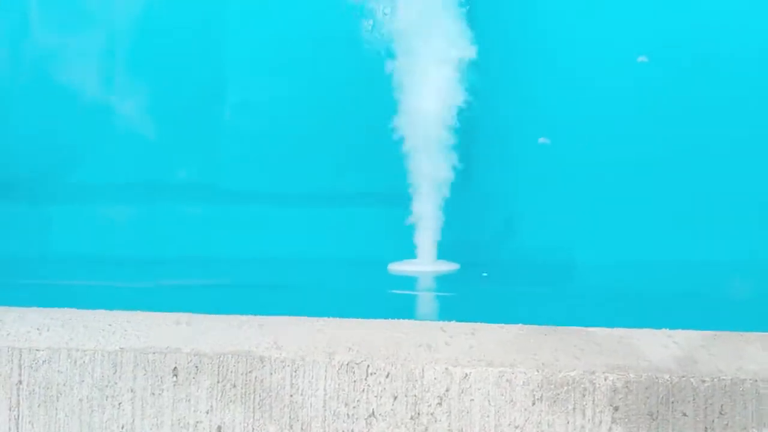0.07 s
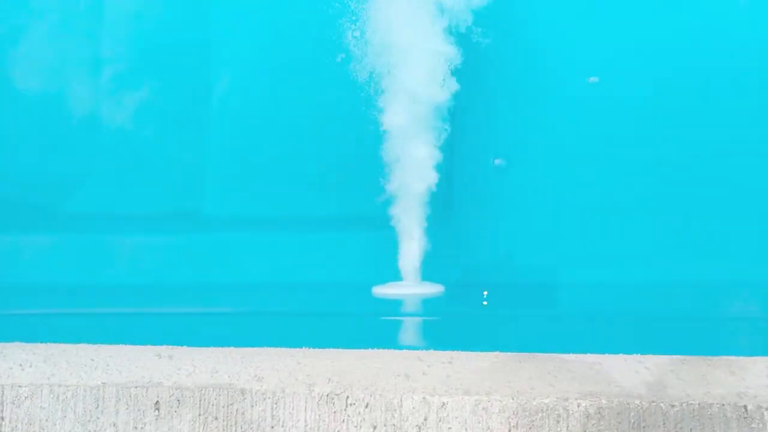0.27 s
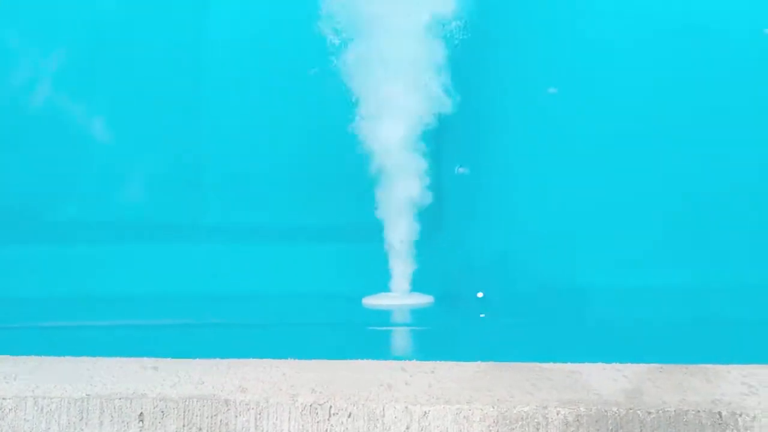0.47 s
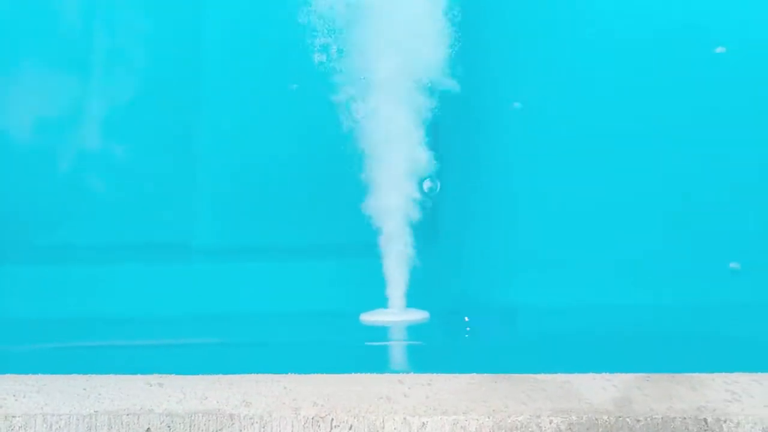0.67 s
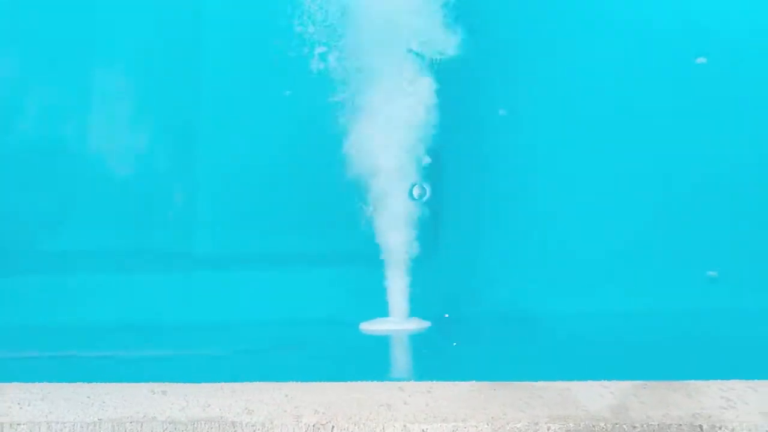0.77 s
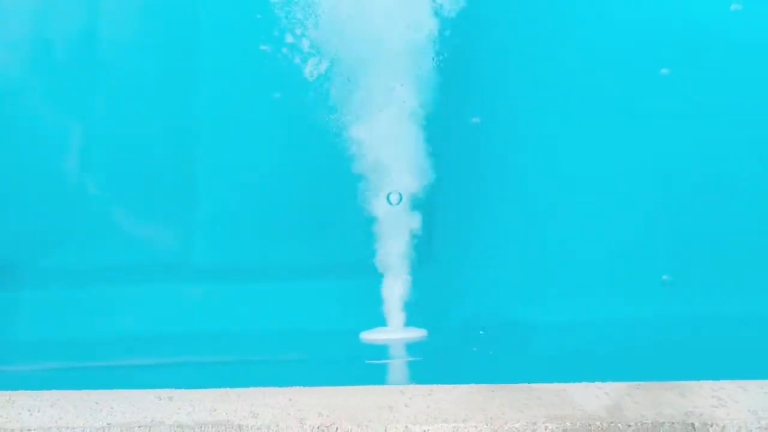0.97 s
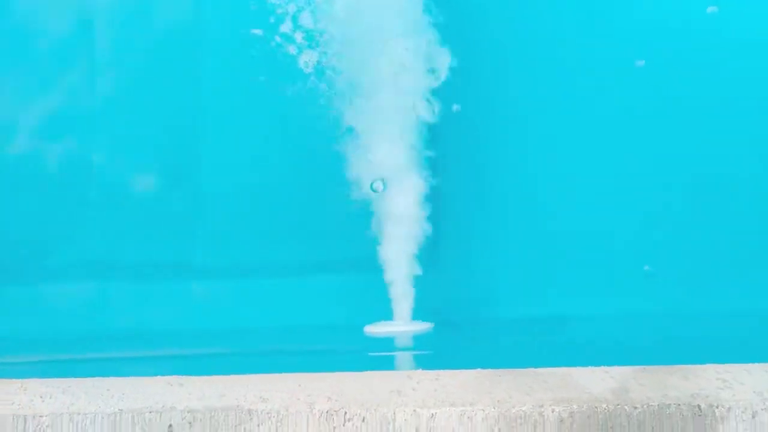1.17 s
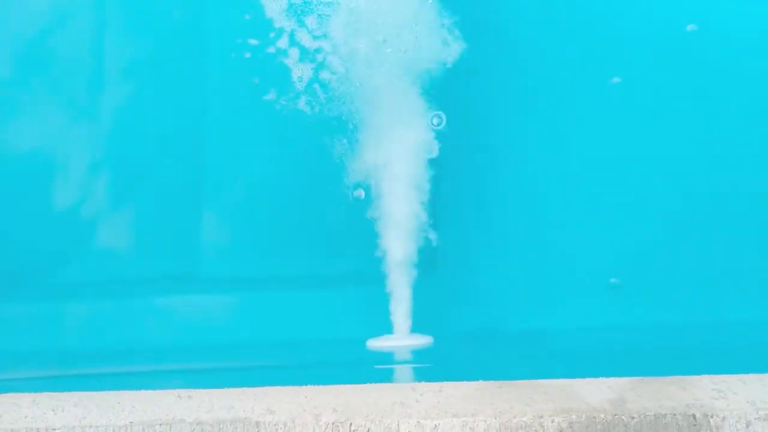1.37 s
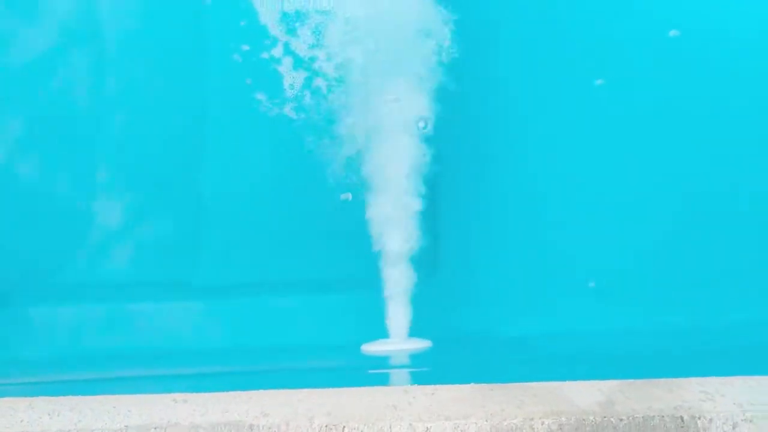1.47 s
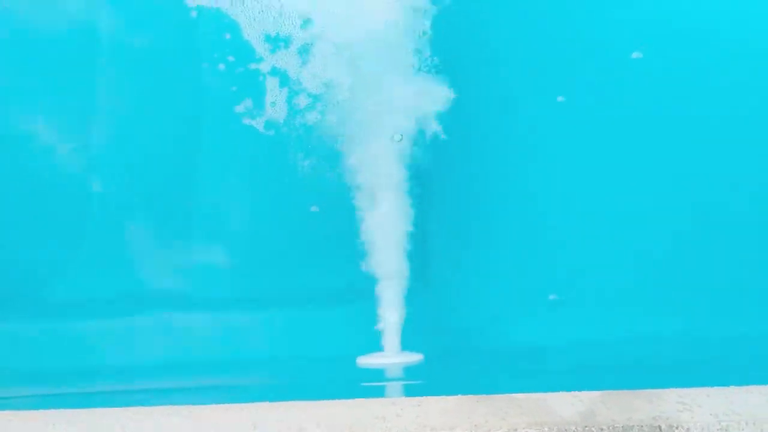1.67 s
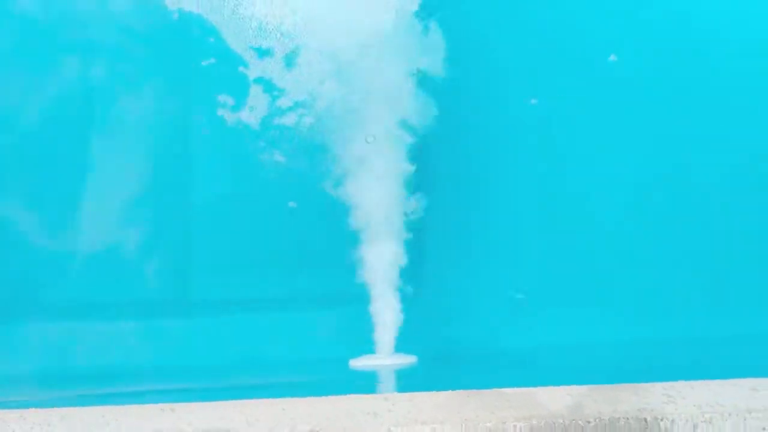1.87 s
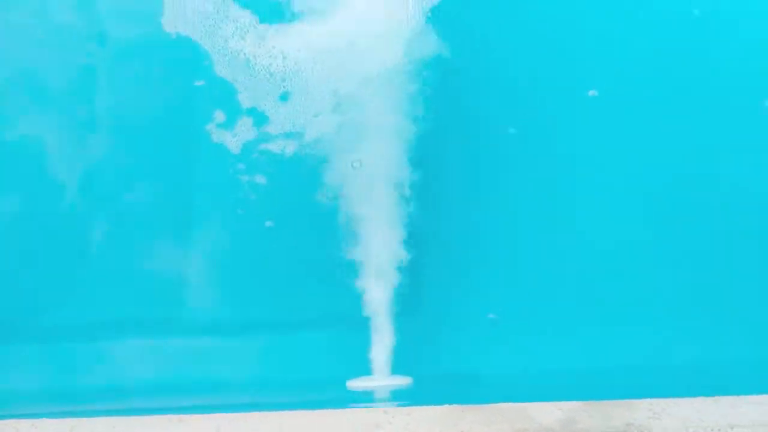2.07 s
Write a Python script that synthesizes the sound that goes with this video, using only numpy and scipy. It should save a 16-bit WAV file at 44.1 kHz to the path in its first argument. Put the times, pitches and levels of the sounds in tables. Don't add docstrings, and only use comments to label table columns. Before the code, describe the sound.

A pool jet blows water and air bubbles, a steady hollow churning rumble with bright fizzing splashes strongest at first, then thinning to a few faint ringing bubbles; outdoors, close small stereo recorder.

```python
import sys
import numpy as np
from scipy import signal
from scipy.fft import rfft, irfft, next_fast_len
from scipy.io import wavfile
from scipy.ndimage import uniform_filter1d, map_coordinates

SR = 44100
rng = np.random.default_rng(int(sys.argv[2]) if len(sys.argv) > 2 else 0)


def amp(db):
    return 10 ** (np.asarray(db, float) / 20)


def write(x):
    x = np.atleast_2d(x).T
    wavfile.write(sys.argv[1], SR, np.round(np.clip(x, -1, 1) * 32767).astype(np.int16))


N = 93536


def unit(x):
    return x / np.sqrt(np.mean(x ** 2) + 1e-20)


def along(points, hz):
    f, v = np.transpose(points)
    return np.interp(np.log(hz + 1), np.log(f + 1), v)


def curve(rows):
    s, v = np.transpose(rows)
    return np.interp(np.arange(N) / SR, s, v)


def wobble(rate):
    return map_coordinates(rng.standard_normal(400), [np.arange(N) * rate / SR])


def filtered(x, response):
    m = next_fast_len(N + SR // 2)
    return irfft(rfft(x, m) * response(np.fft.rfftfreq(m, 1 / SR)), m)[..., :N]


def patchy(x, patchy_db):
    z = signal.stft(x, nperseg=512)[2]
    field = rng.standard_normal(z.shape[1:])
    field = uniform_filter1d(uniform_filter1d(field, size=8, axis=0), size=8, axis=1)
    uneven = signal.istft(z * amp(patchy_db * unit(field)), nperseg=512)[1]
    return unit(uneven[:, :N])


def partly_alike(pair, alike):
    return np.array([pair[0], alike * pair[0] + np.sqrt(1 - alike ** 2) * pair[1]])


def bursts(count, spread_db, share):
    pops = []
    for at, size, sign in rng.random((3, 2, count)).swapaxes(0, 1):
        strength = amp(spread_db * size) * np.sign(sign - 0.5)
        pops.append(np.bincount((at * N).astype(int), strength, N))
    return np.sqrt(share) * unit(np.array(pops)) + np.sqrt(1 - share) * rng.standard_normal((2, N))


def ports(pair, left, right):
    # middle in Hz, width in Hz, depth from 0 to 1.
    common_dips = [(1864, 390, 0), (3078, 62, 0.3), (3690, 120, .7), (4370, 200, 0.4), (4985, 160, 0.5),
                   (6420, 280, 0)]

    def response(hz):
        dips = 1
        for middle, w, depth in common_dips:
            dips = dips * (1 - np.clip(depth, 0, 0.95) * np.exp(-((hz - middle) / w) ** 2))
        no_lows = hz ** 2 / (hz ** 2 + 1200 ** 2)
        return amp([along(left, hz), along(right, hz)]) * dips * no_lows

    out = filtered(pair, response)
    return out / np.std(out[0])


def pipe(f):
    # pitch in Hz, width in Hz, level in dB.
    pipe_modes = [(85.6, 32, -3), (244.1, 25, -13.5), (438.8, 16.7, -3), (501.7, 40, -5), (577.5, 33.5, -1),
                  (721, 70, -3.5), (901, 99, -7.5), (1098, 25, -2.5), (1297, 35, -3.5), (1489, 41.6, -6),
                  (1676, 16, -10.5)]
    top_hz, low_hz = 1657.4, 33
    modes = sum(amp(2 * db) * (f * w) ** 2 / ((c * c - f * f) ** 2 + (f * w) ** 2)
                for c, w, db in pipe_modes)
    return np.sqrt(modes / (1 + (f / top_hz) ** 90)) * f / np.hypot(f, low_hz)


def swelling(x):
    # time in seconds, strength of the gulps in dB.
    gulps = [(0.0, -52), (0.13, -51.5), (0.17, -58), (0.58, -54.5), (0.61, -51), (0.66, -54), (0.86, -55.5),
             (0.88, -67.5), (0.93, -49.5), (1.16, -56.5), (1.32, -63), (1.39, -51.5), (1.45, -63),
             (1.48, -59), (1.91, -53.5), (2.12, -63.5)]
    # time in seconds, strength of the singing in dB.
    singing = [(0.0, -43), (0.1, -41.5), (0.5, -40.5), (0.51, -45), (0.7, -35), (0.74, -42.5),
               (0.99, -38.5), (1.01, -40.5), (1.08, -44.5), (1.1, -32.5), (1.18, -40), (1.31, -37),
               (1.88, -39), (1.9, -38), (2.08, -35), (2.12, -42)]
    gulp_hz, sing_hz = 145, 1246

    def low_and_high(f):
        return np.array([1 / (1 + (f / gulp_hz) ** 8), 1 - 1 / (1 + (f / sing_hz) ** 30)])

    low, high = filtered(x, low_and_high)
    gulp, sing = curve(gulps), curve(singing)
    gulp_gain = amp(gulp - gulp.mean() - 1.5)
    sing_gain = amp(sing - sing.mean() - 0.5)
    return x + low * (gulp_gain - 1) + high * (sing_gain - 1)


def jet():
    # time in seconds, strength of the jet in dB.
    flow = [(0.0, -35.5), (0.5, -36), (0.93, -35.5), (1.11, -33.5), (1.6, -36), (2.12, -36.5)]
    # pitch in Hz, right port over left in dB.
    right_over_left = [(60, -2), (210, -5.5), (600, -5), (880, -3), (1000, -3.1), (1150, 1.5), (1700, -1.5)]
    # pitch in Hz, how far the right port leads in radians.
    right_leads = [(30, 3.46), (700, 2.87), (900, 2.54), (1000, 2.77), (1110, 2.47), (1250, 1.8),
                   (1500, 1.35), (1800, 2.87)]
    # pitch in Hz, share unrelated between the ports in dB.
    unrelated = [(30, -13), (70, -13), (330, -10), (500, -14.5), (1000, -14), (1200, -14), (1700, -11)]
    churn, stray = filtered(patchy(rng.standard_normal((2, N)), patchy_db=1.37), pipe)
    churn, stray = swelling(churn), swelling(stray)

    def turn(hz):
        return amp(along(right_over_left, hz)) * np.exp(1j * along(right_leads, hz))

    stray = filtered(stray, lambda hz: amp(along(unrelated, hz)))
    right = filtered(churn + stray, turn)
    level_db = curve(flow) + 7.5 + 0.55 * wobble(9.1)
    return amp(level_db) * np.array([churn, right]) / np.std(churn)


def drifting(start):
    # pitch in Hz, gain from start to end in dB.
    tilt = [(80, -4), (150, 2), (240, 11.5), (320, 1.5), (550, 3.5), (1100, -2.5), (1500, -1), (1690, 6)]
    share = np.linspace(0, 1, N)
    end = filtered(start, lambda hz: amp(along(tilt, hz)))
    return (1 - share) * start + share * end


def splash():
    # time in seconds, strength of large bubbles breaking in dB.
    breaking = [(0.0, -38.5), (0.02, -36), (0.05, -42.5), (0.16, -43.5), (0.18, -40), (0.19, -45.5),
                (0.29, -42.5), (0.53, -41.5), (0.74, -54.5), (0.89, -55.5), (0.92, -59), (1.01, -50),
                (1.03, -55), (1.16, -51), (1.37, -62.5), (2.12, -65.5)]
    # pitch in Hz, level in dB per Hz.
    splash_left = [(1500, -19), (2100, -4), (3000, -7.5), (4300, -1.5), (4900, -7.5), (5600, -6.5),
                   (7000, -11.5), (10000, -11.5)]
    # pitch in Hz, level in dB per Hz.
    splash_right = [(1500, -23), (2300, -17), (3000, -9), (3500, -13.5), (5600, -7), (7500, -15.5),
                    (8700, -51), (15500, -53)]
    pops = patchy(bursts(count=5000, spread_db=25, share=0.4), patchy_db=2.0)
    pair = ports(partly_alike(pops, 0.13), splash_left, splash_right)
    right_fades_db = -4
    fade = amp(np.outer([0, right_fades_db], np.clip(np.arange(N) / SR, 0, 1)))
    return amp(9 + 0.99 * curve(breaking)) * pair * fade


def fizz():
    # time in seconds, strength of the fine foam in dB.
    fine_foam = [(0.0, -33.5), (0.02, -26.5), (0.03, -31), (0.13, -38), (0.16, -38), (0.18, -34.5),
                 (0.22, -40), (0.27, -35.5), (0.32, -38.5), (0.37, -36.5), (0.39, -41), (0.42, -36),
                 (0.47, -37), (0.52, -32.5), (0.56, -45), (0.58, -41.5), (0.62, -46), (0.88, -48.5),
                 (1.01, -46), (1.07, -48.5), (1.11, -42.5), (1.14, -49.5), (1.165, -41.5), (1.2, -44.5),
                 (1.23, -45), (1.74, -46), (1.84, -42), (1.95, -47), (2.12, -45)]
    # pitch in Hz, level in dB per Hz.
    fizz_left = [(2000, -21.5), (5000, -34.5), (7000, -13.5), (9000, -7), (11000, 0), (12000, -6.5),
                 (13500, -8), (15600, -15)]
    # pitch in Hz, level in dB per Hz.
    fizz_right = [(2000, -27), (6000, -27), (8000, -20), (9000, -33), (10800, -23), (12000, -25),
                  (13200, -25), (14500, -18)]
    pops = patchy(bursts(count=9000, spread_db=16, share=0.24), patchy_db=1.18)
    return amp(7 + 1.0164 * curve(fine_foam)) * ports(pops, fizz_left, fizz_right)


def foam():
    return amp(0.9 * wobble(40)) * (splash() + fizz())


def nozzle():
    # pitch in Hz, width in Hz, level in dB.
    resonances = [(2600, 150, 6), (3480, 66, 1), (4270, 430, -12), (5650, 380, 1), (6640, 230, -3)]
    # time in seconds, swell of the hiss in dB.
    hiss_swell = [(0.0, -0.5), (0.9, -3), (1.3, -1), (1.45, 7), (1.6, 0), (1.85, 1.5), (1.98, 2.5),
                  (2.12, -0.5)]

    def bands(f):
        return sum(amp(db) * np.exp(-((f - c) / w) ** 2) for c, w, db in resonances)

    hiss = unit(filtered(patchy(rng.standard_normal((2, N)), patchy_db=5.0), bands))
    level_db, right_db = -60.5, -5
    return amp(level_db + np.array([[0], [right_db]]) + curve(hiss_swell)) * partly_alike(hiss, 0.48)


def bubbles():
    # start in seconds, pitch in Hz, level in dB, left over right in dB.
    rings = [
        (1.095, 2900, -48, -1),
        (1.105, 3180, -48, 2.5),
        (1.16, 4470, -53, 15),
        (1.429, 2520, -53.5, 2),
        (1.47, 2670, -54.5, -7),
        (1.957, 2620, -51, -1.5),
        (1.99, 2440, -55.5, 7),
    ]
    t60_s, attack_s, rises = 0.12, 0.0026, 0.041
    out, t = np.zeros((2, N + SR)), np.arange(SR // 4) / SR
    for s, hz, db, pan_db in rings:
        tone = np.sin(2 * np.pi * hz * t * (1 + rises * t / t60_s / 2))
        ring = tone * amp(db - 60 * t / t60_s) * (1 - np.exp(-t / attack_s))
        out[:, round(s * SR):][:, :len(t)] += amp([[pan_db / 2], [-pan_db / 2]]) * ring
    return out[:, :N]


def starved(x):
    # pitch in Hz, rounding step over nearby level in dB.
    step_left = [(1200, -18), (1850, 0), (3000, 1), (5000, 1), (6500, -2), (8500, -13), (12500, -16),
                 (15400, 3)]
    # pitch in Hz, rounding step over nearby level in dB.
    step_right = [(1200, -18), (2000, -1), (3000, 2), (6000, 0), (7500, 0), (8800, 5), (13500, 3),
                  (14500, 30)]
    # pitch in Hz, width in Hz, extra step in dB.
    worst_bands = [(1920, 140, 6), (3060, 120, 6), (3620, 140, 8), (4680, 110, 5), (5150, 150, 6),
                   (6380, 110, 4), (6900, 150, 3)]
    hop, grid = 1024, 608
    n, k = np.arange(2 * hop)[:, None] + 0.5, np.arange(hop) + 0.5
    window = np.sin(np.pi * n / (2 * hop))
    basis = window * np.cos(np.pi / hop * (n + hop / 2) * k) * np.sqrt(2 / hop)
    padded = np.pad(x, ((0, 0), (2 * hop - grid, 3 * hop - (N - grid) % hop)))
    blocks = padded.reshape(2, -1, hop)
    c = np.concatenate([blocks[:, :-1], blocks[:, 1:]], axis=2) @ basis
    mid_edges = np.geomspace(40, 320, 40).astype(int)
    edges = np.unique(np.r_[np.arange(0, 40, 4), mid_edges, np.arange(320, hop, 16)])
    width = np.diff(np.r_[edges, hop])
    level = 10 * np.log10(np.add.reduceat(c ** 2, edges, axis=2) / width + 1e-14)
    hz = (edges + width / 2) * SR / (2 * hop)
    draws = rng.standard_normal(level.shape) + 2 * rng.standard_normal(level.shape[1:])
    chance = unit(uniform_filter1d(draws, size=4, axis=1))
    treble = level[0][:, (hz > 2000) & (hz < 13000)].mean(1, keepdims=True)
    loud_dulls, quiet_drops = 1, 0.45
    swing = (treble - np.median(treble)) * np.where(hz > 13500, loud_dulls, -quiet_drops)
    near = uniform_filter1d(uniform_filter1d(level, size=3, axis=1), size=9, axis=2)
    worst = sum(db * np.exp(-((hz - at) / w) ** 2) for at, w, db in worst_bands)
    usual = np.array([along(step_left, hz), along(step_right, hz)])[:, None]
    step_db = near + 7 * chance + swing + worst + usual
    step_db = np.where(step_db > level + 6, step_db + 20, step_db - 4)
    step = np.repeat(amp(step_db), width, axis=2)
    rounded = np.sign(c) * np.floor(abs(c) / step + 0.4) * step
    y = rounded @ basis.T
    joined = (y[:, 1:, :hop] + y[:, :-1, hop:]).reshape(2, -1)
    return joined[:, hop - grid:][:, :N]


def scene():
    return drifting(jet()) + foam() + nozzle() + bubbles()


def roll_off(x):
    return signal.sosfilt(signal.butter(12, 15720, fs=SR, output="sos"), x)


def record(dry):
    mix = starved(dry)
    return roll_off(mix)


dry = scene()
out = record(dry)
write(out)
```